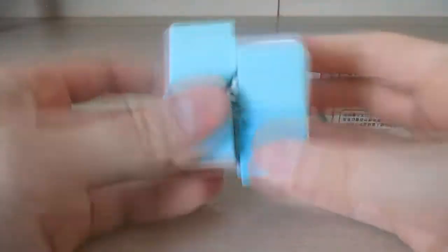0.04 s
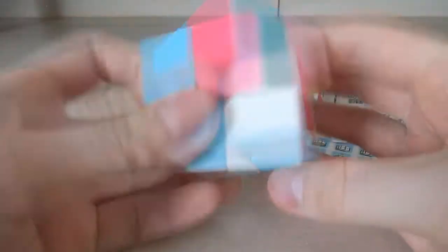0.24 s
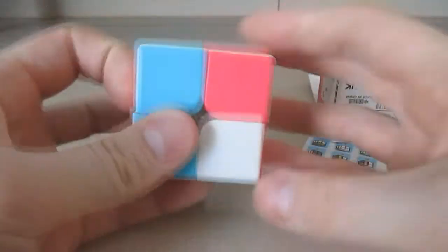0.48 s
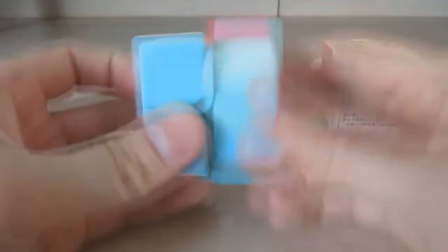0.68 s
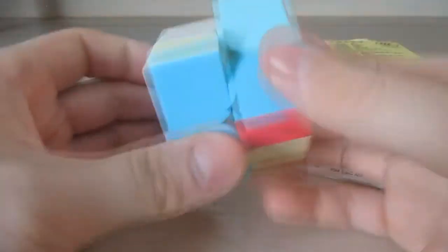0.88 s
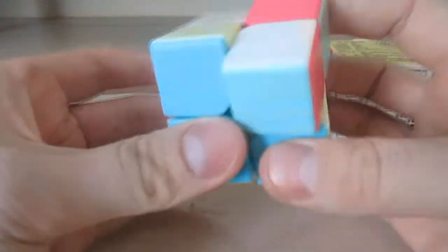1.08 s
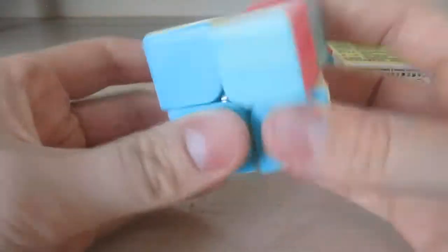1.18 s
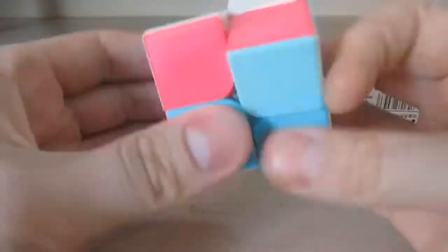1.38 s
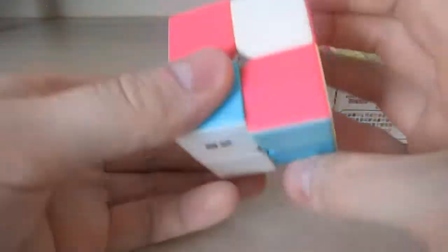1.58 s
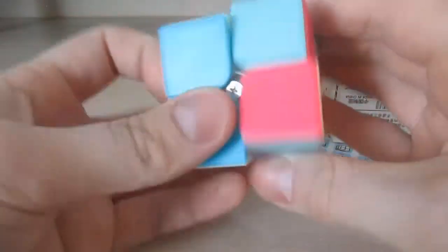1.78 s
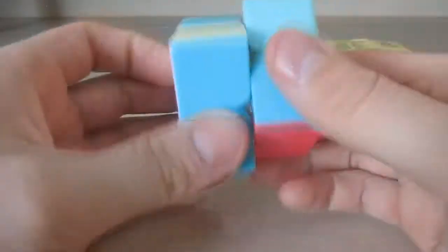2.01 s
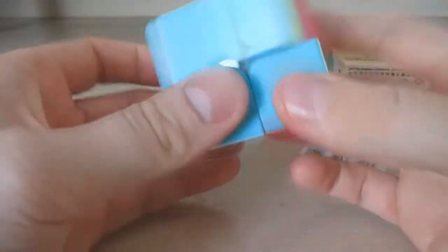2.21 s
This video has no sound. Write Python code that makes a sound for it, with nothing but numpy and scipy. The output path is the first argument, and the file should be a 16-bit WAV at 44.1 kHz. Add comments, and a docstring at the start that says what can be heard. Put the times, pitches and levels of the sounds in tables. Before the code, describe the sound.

Close, dry plastic clacks from a hand-twisted cube puzzle, irregular and bright, with hollow knocks, brief sliding scrapes and a soft finger swish; lighter ticks thin out at the end over faint room tone.

```python
"""Hands twist a small hollow plastic cube puzzle close to a phone microphone in a quiet room, 2.25 s.
Light knocks open, then hard snaps come near 0.23, 1.06 and 1.44 s, and lighter catches thin out to the end.
Each catch is a decaying sine knock near 1 kHz plus noise scratches ringing the shell: a clack and a tick.
Between them resonated hiss and tiny catches slide; filtered-noise skin brushes swish, clearest at 1.4 s.
Handling rumble grows until 1.75 s; a faint noise tail answers from the room over steady room tone."""
import sys
import numpy as np
from scipy import signal
from scipy.fft import rfft, irfft
from scipy.io import wavfile
from scipy.ndimage import uniform_filter1d

SR = 44100
rng = np.random.default_rng(int(sys.argv[2]) if len(sys.argv) > 2 else 0)


def to_wav(s):
    """Save 16-bit WAV."""
    ch = np.atleast_2d(s).T  # columns
    pcm = np.round(np.clip(ch, -1, 1) * 32767)  # PCM
    wavfile.write(sys.argv[1], SR, pcm.astype(np.int16))


N = 99225

# Catches and snaps of the pieces:
# (time [s], knock strength before shaping [dB], knock pitch [Hz], clack peak [dB], tick peak [dB])
CATCHES = [(0.0084, -22, 1123, -48, -45), (0.088, -23.5, 1050, -40.5, -45), (0.0979, -18, 1015, -39, -48),
           (0.1143, -13.5, 1340, -27, -39), (0.1419, -31, 1060, -37, -34), (0.147, -15, 1130, -26.5, -40),
           (0.217, -2.5, 1090, -27, -38), (0.222, -8.5, 1163, -12.5, -25), (0.226, 5.5, 1151, -6, -14),
           (0.2277, -1.5, 1060, -11, -16.5), (0.3462, -23.5, 1118, -40.5, -51),
           (0.3676, -16.5, 1075, -42, -55), (0.613, -43.5, 1060, -47, -58),
           (0.7027, -19.5, 1150, -24, -58.5), (0.7108, -15.5, 1190, -20, -40.5),
           (0.713, -8.5, 1238, -16, -45), (0.718, -33, 1130, -41.5, -36), (0.7596, -21.5, 1100, -32, -51),
           (0.776, -45, 1050, -45, -37), (0.7796, -37, 1086, -27, -52), (0.7832, -6, 1082, -14, -29.5),
           (0.793, -30, 1160, -46, -51), (0.9033, -48, 1020, -43, -50), (1.0571, -4, 987, -25, -26.5),
           (1.061, -11.5, 1095, -15.5, -30), (1.0628, 2, 1205, -12.5, -19.5), (1.066, -9.5, 1040, -21, -43),
           (1.0753, -17.5, 1120, -34, -33), (1.0849, -30, 1100, -39, -53), (1.23, -18, 1210, -56, -62),
           (1.256, -26, 1150, -32.5, -42.5), (1.267, -4.5, 1047, -27, -43), (1.2719, -11, 1322, -22, -34),
           (1.281, -17, 1070, -31, -56), (1.316, -51, 1080, -43, -49), (1.382, -9.5, 1120, -23, -34),
           (1.3939, -22, 1080, -36, -40), (1.401, -12.5, 1136, -42, -40), (1.4181, -17, 1320, -22, -28),
           (1.4222, -21, 1150, -30, -42), (1.4296, -15, 1300, -30, -28), (1.4371, -6, 1336, -15, -19.5),
           (1.4397, 5, 1144, -6.5, -11), (1.4559, -16, 1100, -29, -46), (1.474, -22.5, 1190, -36, -47),
           (1.5226, -18.5, 1153, -36, -36), (1.5329, -20.5, 1000, -31.5, -52),
           (1.645, -25.5, 1020, -51, -68), (1.6922, -28, 1010, -39.5, -47), (1.7387, -7.5, 1107, -17, -36),
           (1.7617, -12, 1174, -25, -24.5), (1.764, -7.5, 1037, -23, -20.5), (1.7691, -21, 1070, -26, -50),
           (1.8546, -17.5, 1096, -32, -35.5), (1.883, -11.5, 1114, -24.5, -51),
           (1.8913, -18.5, 1140, -28, -37), (1.899, -18, 1120, -36, -36), (1.9683, -33, 1050, -39, -39),
           (1.9756, -18.5, 1000, -25.5, -36), (1.9805, -19, 1050, -40, -54), (1.9904, -16, 1400, -22, -44),
           (1.9937, -20, 1020, -48, -57), (2.0513, -16.5, 1064, -31.5, -45), (2.12, -41, 990, -39.5, -57),
           (2.153, -32, 1030, -73, -68), (2.2137, -28, 1245, -37, -75)]
# Dull, low thuds at some of the catches: (time [s], envelope peak [dB], pitch [Hz])
THUDS = [(0.227, -51, 207), (0.345, -46, 565), (1.057, -37, 304), (1.267, -45.5, 290), (1.44, -45, 147),
         (1.761, -32.5, 714), (0.783, -47.5, 430)]
# Shell resonances of the pieces, low then high: (frequency [Hz], width [Hz], relative level [dB])
LOW_SHELL = [(1663, 625, -1), (2214, 854, 1), (3130, 430, 0.5), (3560, 245, -4.5), (4217, 455, -6.5)]
HIGH_SHELL = [(5020, 1000, -1), (6305, 180, 7), (6590, 1210, -1.5), (9100, 1900, -4), (10610, 3700, -10),
              (14460, 6100, -18.5)]
# The hollow as sliding excites it: (frequency [Hz], width [Hz], relative level [dB])
CAVITY = [(866, 463, -9), (1045.5, 91.5, 4.5), (1182, 64, -2), (1387, 320, -9)]
# Sliding: (time [s], hollow level [dB], low shell level [dB], high shell level [dB])
SLIDE_LEVELS = [(0, -45.5, -52.5, -67), (0.052, -61.5, -71, -76), (0.076, -46, -66, -76),
                (0.142, -42, -51.5, -60), (0.183, -51, -60.5, -69), (0.22, -30.5, -34.5, -37.5),
                (0.242, -45, -56, -63), (.39, -48, -57.5, -65.5), (0.419, -85, -71, -77.5),
                (0.489, -80, -100, -101), (0.591, -57, -67, -78.5), (0.672, -73, -99, -99),
                (0.708, -28, -36, -43), (.722, -44, -51.5, -60), (0.741, -30.5, -45, -48.5),
                (0.751, -43.5, -50, -56), (0.799, -38, -47, -52.5), (0.83, -57.5, -62.5, -74),
                (1.02, -49, -64, -68), (1.06, -41.5, -43.5, -45), (1.072, -36, -40.5, -54),
                (1.099, -43.5, -51.5, -63.5), (1.204, -62.5, -64, -82), (1.264, -40.5, -50, -59),
                (1.357, -59.5, -65, -77), (1.387, -44, -47, -46.5), (1.433, -36, -38.5, -45.5),
                (1.468, -43.5, -50.5, -66.5), (1.531, -41.5, -49.5, -46), (1.577, -46.5, -57.5, -64),
                (1.62, -53, -75, -80), (1.682, -41, -58, -63), (1.716, -51.5, -68.5, -68),
                (1.764, -36.5, -40.5, -48), (1.819, -54.5, -67.5, -73), (1.891, -38, -43.5, -46.5),
                (1.915, -44, -51.5, -58), (1.938, -41.5, -52.5, -54.5), (1.982, -40, -50, -58),
                (2.044, -55.5, -64, -74), (2.25, -52, -66.5, -70.5)]
# Weight of hiss against tiny catches, 0 to 1: (hollow, low shell, high shell)
HISS_SHARES = (0.48, 0.65, 0.62)
# Fingertips and faces brushing past: (start time [s], length [s], level [dB])
BRUSHES = [(0, 0.05, -67), (0.305, 0.12, -68.5), (0.866, 0.14, -69.5), (1.37, 0.09, -54.5),
           (1.5, 0.075, -69), (2.064, .12, -70.5)]
# Airy colour of the brushes: (frequency [Hz], width [Hz], relative level [dB])
BRUSH_COLOUR = [(9040, 3100, 11), (12900, 7400, -2.5)]
# Handling rumble: (time [s], level [dB])
RUMBLE_LEVELS = [(0, -83.5), (1.75, -59.5), (2.25, -65)]
# Decay of the room tail: (frequency [Hz], time to fall 60 dB [s])
ROOM_T60 = [(300, 0.6), (3000, 0.35), (15000, 0.17)]
# Room tone spectrum: (frequency [Hz], relative density [dB])
AIR_SPECTRUM = [(25, -2.5), (60, 2), (95, 1), (250, -8), (600, -14), (1050, -11), (1450, -19.5),
                (3100, -22), (5900, -31.5), (11500, -36), (16000, -62)]

KNOCK_RISE_S, KNOCK_T60_S = 0.0013, 0.013
HOLLOW_HZ, HOLLOW_T60_S, HOLLOW_DB = 1063, 0.031, -15.5  # level relative to the knock
CLACK_S, TICK_S = 0.0005, 0.0006  # scratch decay times
SNAP = 1.57  # how far the instant of release stands out of the scratch
THUD_S = 0.0023  # rise and fall time
CATCHES_PER_S, CATCH_SPREAD_DB = 1200, 3  # tiny catches while sliding; spread before its cap
UNEVEN_DB, UNEVEN_S = 3.5, 0.0068  # the grip wavers: standard deviation, smoothing time
ROOM_DB, ROOM_DELAY_S = -27, 0.006
AIR_DB = -63.5
CEILING, EDGE_HZ = 0.96, 15750  # preamp soft overload (full scale = 1), upper band edge


def catches():
    """Each catch knocks the piece, rings its hollow and scratches its shell."""
    out = np.zeros(N)
    t = np.arange(3072) / SR
    noise = rng.standard_normal((len(CATCHES), 2, 768))
    rise = 1 - np.exp(-(t / KNOCK_RISE_S) ** 2)
    hollow = amp(HOLLOW_DB - 60 * t / HOLLOW_T60_S) * np.sin(2 * np.pi * HOLLOW_HZ * t)
    for (s, knock_db, hz, clack_db, tick_db), (clack_noise, tick_noise) in zip(CATCHES, noise):
        knock = amp(-60 * t / KNOCK_T60_S) * np.sin(2 * np.pi * hz * t)
        body = high_passed(rise * (knock + hollow), 471)
        clack = amp(clack_db) * scratch_burst(clack_noise, CLACK_S, LOW_SHELL)
        tick = amp(tick_db) * scratch_burst(tick_noise, TICK_S, HIGH_SHELL)
        add(out, s, -amp(knock_db) * body)
        add(out, s, clack + tick)
    return out


def scratch_burst(noise, decay_s, modes):
    """A short scratch with one sharp snap rings the shell; its envelope peaks at 1."""
    t = np.arange(len(noise)) / SR
    scratch = evened(noise * t * np.exp(-t / decay_s))
    scratch[round(decay_s * SR)] -= SNAP * np.linalg.norm(scratch) / 2
    sound = high_passed(ring(scratch, modes), 0.38 * modes[0][0])
    sound = low_passed(sound, 0.92 * modes[-1][0])
    return sound / abs(signal.hilbert(sound)).max()


def thuds():
    """Dull thuds: sines that swell and die within milliseconds."""
    out = np.zeros(N)
    t = np.arange(3072) / SR
    for s, db, hz in THUDS:
        envelope = t / THUD_S * np.exp(1 - t / THUD_S)
        add(out, s, amp(db) * np.sin(2 * np.pi * hz * t) * envelope)
    return out


def sliding():
    """Fine hiss plus many tiny catches ring hollow and shell as the layers turn."""
    s, *levels_db = np.transpose(SLIDE_LEVELS)
    size_db = CATCH_SPREAD_DB * np.minimum(rng.exponential(1, N), 3)
    size = amp(size_db) * rng.standard_normal(N)
    tiny_catches = evened(size * (rng.random(N) < CATCHES_PER_S / SR))
    hiss = rng.standard_normal(N)
    # one waver common to all three bands, and one of each band's own
    wavers = uniform_filter1d(rng.standard_normal((4, N)), round(UNEVEN_S * SR))
    shared, *own = wavers
    t = np.arange(N) / SR
    out = np.zeros(N)
    bands = (CAVITY, LOW_SHELL, HIGH_SHELL)
    for db, waver, share, modes in zip(levels_db, own, HISS_SHARES, bands):
        friction = share * hiss + (1 - share) * tiny_catches
        rub = high_passed(ring(friction, modes), 0.61 * modes[0][0])
        rub = low_passed(rub, 10500)
        grip = amp(UNEVEN_DB * evened(shared + waver))
        out += amp(np.interp(t, s, db)) * evened(grip * rub)
    return out


def brushes():
    """Skin and faces brush past plastic: high resonant noise under arched strokes."""
    t = np.arange(N) / SR
    strokes = np.zeros(N)
    for s, length, db in BRUSHES:
        progress = np.clip((t - s) / length, 0, 1)
        strokes += amp(db) * np.sin(np.pi * progress) ** 0.6
    swish = evened(high_passed(ring(rng.standard_normal(N), BRUSH_COLOUR), 7000))
    return strokes * swish


def handling_rumble():
    """Low rumble of moving hands: noise through one broad low resonance."""
    t = np.arange(N) / SR
    rumble = evened(ring(rng.standard_normal(N), [(111.1, 290, 0)]))
    return amp(np.interp(t, *np.transpose(RUMBLE_LEVELS))) * rumble


def room(x):
    """The room answers with a delayed noise tail whose bands die at their own speed."""
    hz, t, bands = signal.stft(rng.standard_normal(SR // 2), SR, nperseg=256)
    decay = amp(-60 * t / read(ROOM_T60, hz)[:, None])
    tail = signal.istft(bands * decay, SR, nperseg=256)[1]
    tail *= np.arange(len(tail)) > ROOM_DELAY_S * SR
    return signal.fftconvolve(x, tail / np.linalg.norm(tail))[:N]


def air():
    """Steady room tone: noise shaped by its spectrum."""
    hz = np.fft.rfftfreq(N, 1 / SR)
    spectrum = rfft(rng.standard_normal(N)) * amp(read(AIR_SPECTRUM, hz))
    return amp(AIR_DB) * evened(irfft(spectrum, N))


def ring(x, modes):
    """Passes x through parallel resonances of alternating sign."""
    out = np.zeros(len(x))
    for k, (hz, width, db) in enumerate(modes):
        b, a = signal.iirpeak(hz, hz / width, SR)
        out += (-1) ** k * amp(db) * signal.lfilter(b, a, x)
    return out


def high_passed(x, hz):
    """Third-order cut below hz."""
    return signal.sosfilt(signal.butter(3, hz, "high", fs=SR, output="sos"), x)


def low_passed(x, hz):
    """Second-order cut above hz."""
    return signal.sosfilt(signal.butter(2, hz, fs=SR, output="sos"), x)


def amp(db):
    """Amplitude factor of a level in dB."""
    return 10 ** (np.asarray(db) / 20)


def evened(x):
    """Scales x to an RMS of 1."""
    return x / np.sqrt(np.mean(x ** 2) + 1e-20)


def read(points, hz):
    """Reads a table between its points on a log frequency axis."""
    f, value = np.transpose(points)
    return np.interp(np.log(hz + 1), np.log(f + 1), value)


def add(mix, s, sound):
    """Adds a sound to the mix at s seconds, cut at the end of the mix."""
    part = mix[round(s * SR):][:len(sound)]
    part += sound[:len(part)]


def scene():
    """The cube and hands up close, their room tail, and the room tone behind."""
    cube = catches() + thuds() + sliding() + brushes() + handling_rumble()
    return (cube + amp(ROOM_DB) * room(cube) + air())[None]


def record(dry):
    """The preamp rounds off the loudest snaps softly; then the band limit."""
    soft = CEILING * np.tanh(dry / CEILING)
    band_limit = signal.firwin(511, EDGE_HZ, window=("kaiser", 9), fs=SR)
    return signal.oaconvolve(soft, band_limit[None], "same")


dry = scene()
out = record(dry)
to_wav(out)
```